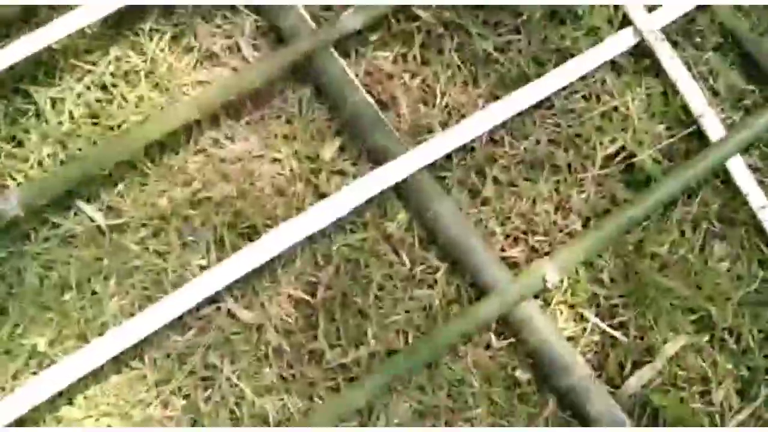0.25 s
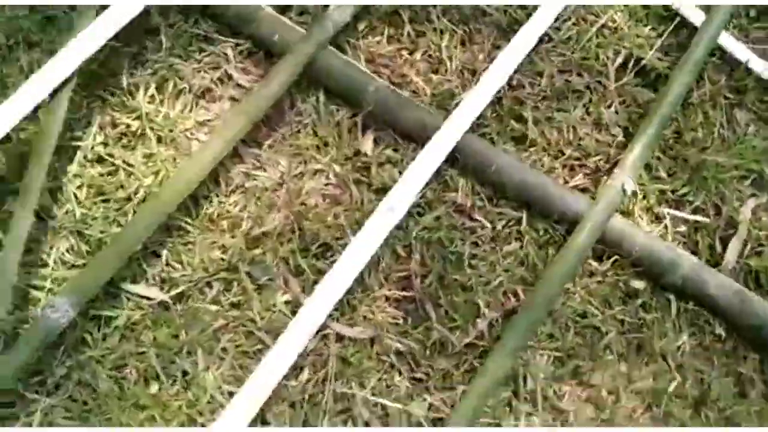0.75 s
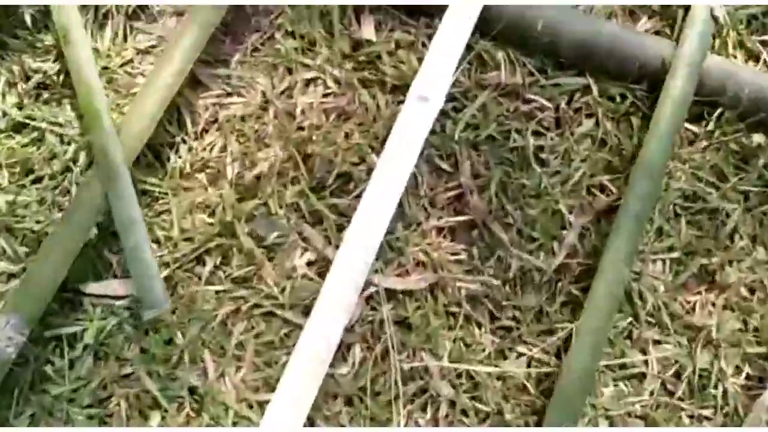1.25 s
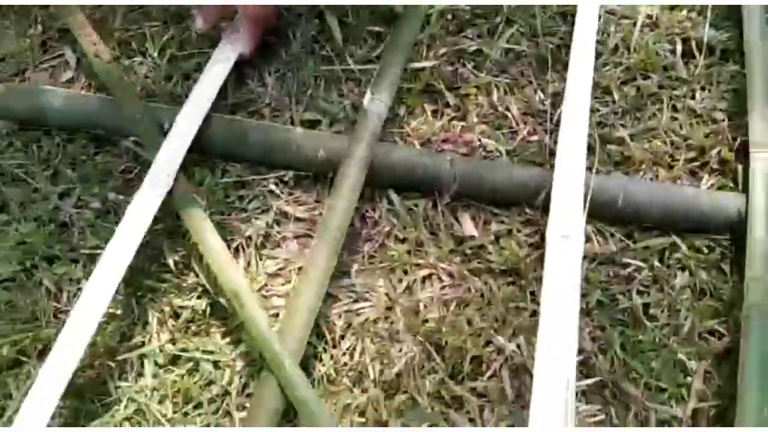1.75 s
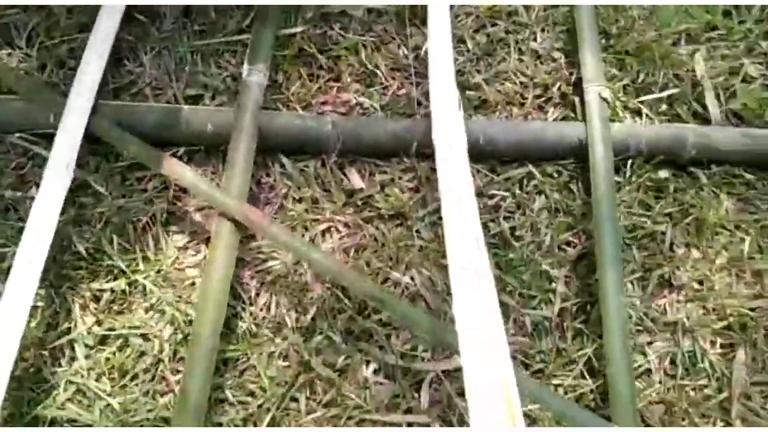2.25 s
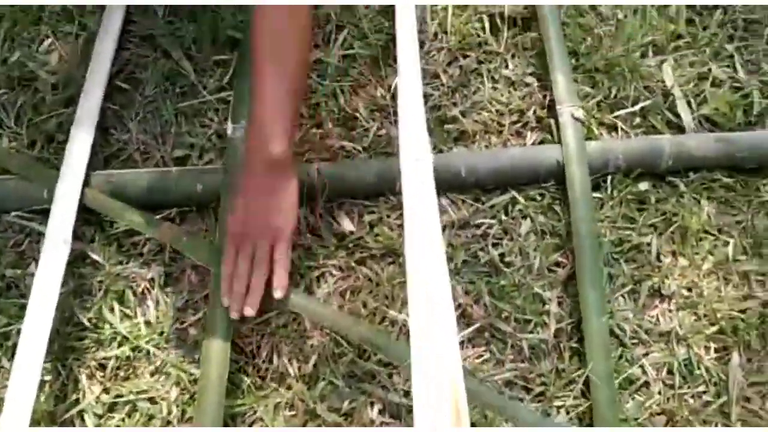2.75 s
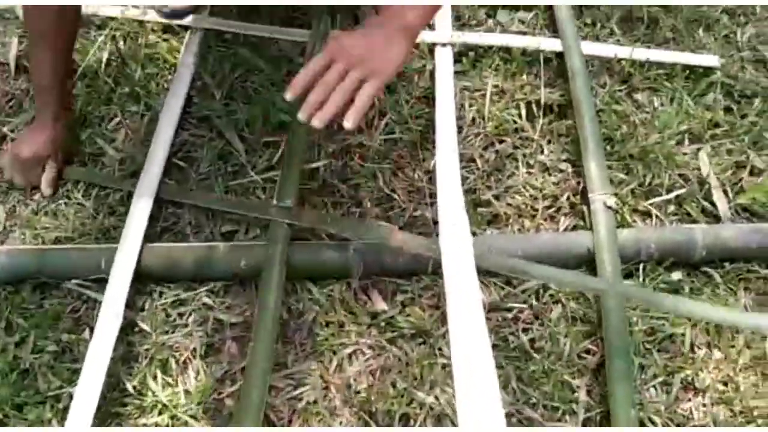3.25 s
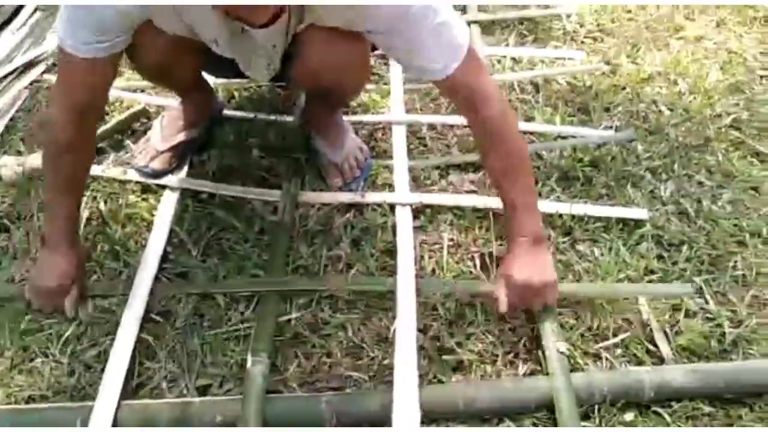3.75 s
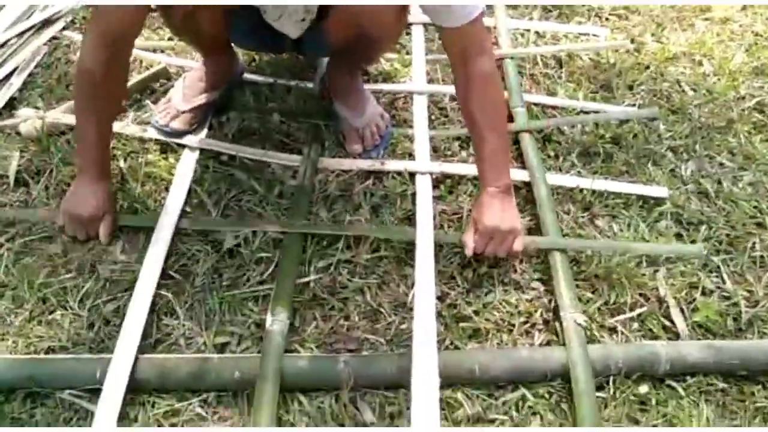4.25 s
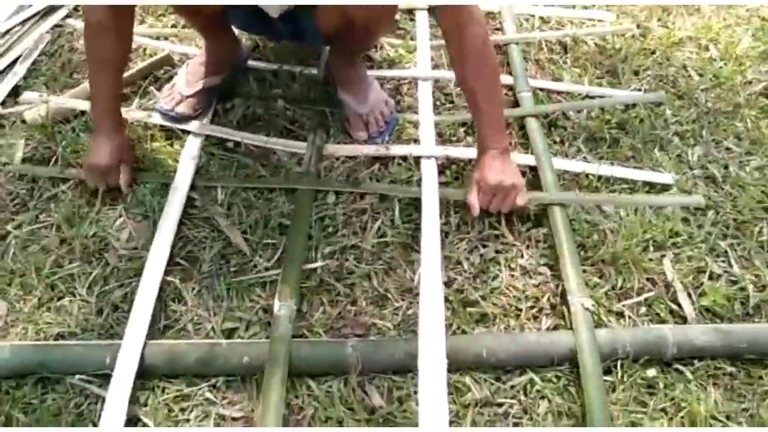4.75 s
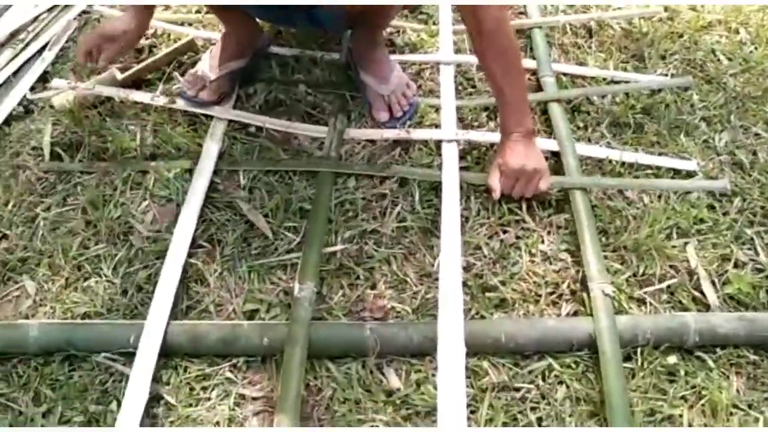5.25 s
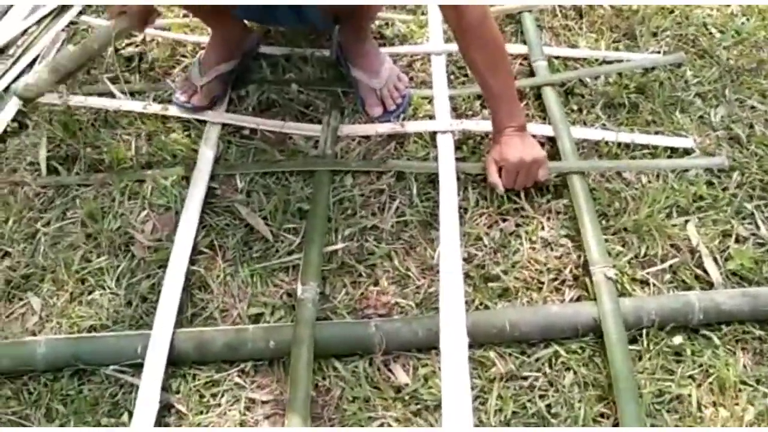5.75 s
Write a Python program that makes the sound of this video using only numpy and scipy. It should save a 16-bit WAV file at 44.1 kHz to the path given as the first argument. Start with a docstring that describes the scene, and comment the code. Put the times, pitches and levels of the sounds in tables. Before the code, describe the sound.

Close, dry bamboo clatter and raspy sliding in uneven bursts for four seconds, fading to soft rustles, one crisp snap and a thin bird call.

```python
"""Split bamboo strips are dragged over poles and knock against them, close to a phone: stick-and-slip
noise scrapes, ringing tones with a crack and a hollow knock clack, and single fibres snap.
Hands and pole ends thud on the ground as short low tones; wind buffets the microphone as low noise.
Steady noise makes an outdoor hush, wavering sines a faint far tone near 800 Hz and a bird's falling
whistles. The phone cuts the deepest bass and turns steady noise down."""
import sys
import numpy as np
from scipy import signal
from scipy.fft import rfft, irfft, next_fast_len
from scipy.io import wavfile
from scipy.ndimage import uniform_filter1d, map_coordinates

SR = 44100
rng = np.random.default_rng(int(sys.argv[2]) if len(sys.argv) > 2 else 0)


def unload_wav(signal):
    """Save mono or channel-first audio to the path in sys.argv[1] as 16-bit WAV at rate SR, clipped to [-1, 1]."""
    wavfile.write(
        sys.argv[1],
        SR,
        np.round(np.clip(np.atleast_2d(signal).T, -1, 1) * 32767).astype(np.int16),
    )


def rack_gain(trim_db):
    """Turn a fader trim in dB into the linear factor to multiply a signal by."""
    fader = np.asarray(trim_db, float)
    return 10 ** (fader / 20)


N = 263718  # length in samples

# Pulls of a strip over the poles; rise and fall are the times for 20 dB, at least 0.002 s:
# (peak t/s, rise t/s, fall t/s, peak level/dB, fibre hiss against the scrape level/dB)
STROKES = [(0.01, 1.8, 0.23, -49.5, -5.5), (0.28, -0.4, 0.4, -57, -6), (0.40, 0.14, -1.1, -51.5, 0.5),
           (0.49, 0.23, 0.47, -49.5, -5.5), (0.57, -0.3, 0.6, -49.5, -0.5), (0.658, 0.04, 0.03, -40, -0.5),
           (0.74, .1, 0.16, -49.5, 1), (0.842, 0.15, 0.13, -40, -3), (1.0, 0, 0.2, -54, -5.5),
           (1.10, 0.45, 0.12, -52.5, 0.3), (1.17, 0.1, -0.03, -54.5, 2.5), (1.365, -0.04, .12, -55, 4.5),
           (1.461, -0.0349, -0.64, -41, 1.5), (1.61, 0.4, .3, -51.5, -6), (1.71, 0.1052, 0.38, -42.5, .1),
           (1.86, 0.1539, 0.24, -36.5, -5), (1.90, 0.11, .1, -35.5, -5), (1.929, 0.0666, 0.06, -27.5, -8.5),
           (1.963, 0.09, -0.03, -36, -9), (2.12, 0.24, 0.08, -45.5, 1), (2.22, 0.22, 0.14, -45, -4),
           (2.34, 1.2, 0.7, -56.5, -7.5), (2.395, 0.0452, 0.05, -35, -1.5), (2.48, 0.14, 0.11, -43, 2.7),
           (2.77, 3.3, 3.5, -55, -2.5), (2.83, 0.1, 0.47, -44, -3), (2.9, 0.0848, 0.23, -39.5, 1),
           (2.945, .15, 0.03, -34, 0.5), (2.989, 0.0334, 0.0318, -26, -5), (3.004, 0.03, 0, -32, -0.5),
           (3.03, -0.02, 0.08, -37, -20), (3.22, -0.3, 0.1, -51, -5), (3.36, 1.1, -0.3, -51.5, -3.5),
           (3.585, 0.45, 0.3, -49.5, -3), (3.644, 0.0638, -0.0157, -34, -4.5),
           (3.682, 0.0372, 0.02, -22, -3), (3.716, 0.0667, -0.01, -25, -4.5), (3.77, -4, 1.6, -50.5, -35.5),
           (3.9, 2, 2.5, -58, -13), (4.049, 0.1, 0.28, -39.5, -0.5), (4.2, 0.35, 0.35, -42.5, -0.5),
           (4.269, -0.34, 0.01, -42, 1), (4.44, 0.15, 0.19, -43.5, 3), (4.51, 0.24, 0.02, -43.5, 2.5),
           (4.669, -0.9, 0.2, -50.5, -1), (4.743, 0.27, 0, -46.5, 7), (4.834, -2.3, 0.65, -57.5, -15),
           (4.968, 0, 0.26, -51, 0.7), (5.11, -0.3, 0.5, -59, 0.5), (5.39, 0.05, 0.24, -57.5, 2.5),
           (5.569, 0.13, 0.16, -51.5, -2), (5.98, -0.2, 4.2, -52, -4)]
# How firmly the strip bears on the poles: (t/s, sound of the poles against the scrape level/dB)
BEARING = [(0, -11.5), (0.3, -9.5), (0.45, -16), (0.8, -13.5), (1.15, -13), (1.25, -33), (1.42, -35),
           (1.5, -15), (1.8, -14.5), (1.9, -19.5), (2.05, -10.5), (2.3, -14), (2.45, -12.5), (2.75, -18),
           (2.92, -24), (3.05, -10.5), (3.3, -11), (3.5, -21), (3.68, -20.5), (3.8, -9), (4.0, -20.5),
           (4.4, -20), (4.53, -9.5), (4.7, -31), (4.87, -21), (4.93, -11.5), (5.13, -11), (5.22, -40),
           (5.5, -38), (5.56, -7.5), (5.8, -7.5), (5.98, -25)]
# Tone colour of the scraping strip: (f/Hz, relative level per Hz level/dB)
SCRAPE_COLOUR = [(820, -55.5), (1400, -19.5), (1660, -20), (2060, -12), (2330, -3.5), (2670, -2),
                 (3010, -5), (3670, -6), (4370, -13.5), (4900, -34.5), (6370, -64), (10800, -120)]
# Tone colour of the hissing fibres: (f/Hz, relative level per Hz level/dB)
FIBRE_COLOUR = [(2760, -44), (4700, -9), (5000, -10.5), (5180, -7.5), (6230, -2.5), (6830, -2), (7450, 1.5),
                (12000, -25.5), (15000, -33), (16000, -38)]
# Tone colour of the rubbed hollow poles: (f/Hz, relative level per Hz level/dB)
POLE_COLOUR = [(150, -48.5), (250, -16.5), (663, -12.5), (842, -12.5), (1020, -8.5), (1260, -15.5),
               (1800, -9.5), (2340, -40.5), (3960, -120)]
# After each knock a low-mid noise tail lingers and fades: level against the knock, time to fall by 20 dB
TAIL_DB, TAIL_FALL_S = -14, 0.062

# Puffs of wind; rise and fall are the times for 20 dB, at least 0.002 s:
# (peak t/s, rise t/s, fall t/s, peak level/dB)
GUSTS = [(0.0, .02, 0.06, -45), (0.315, .012, 0.1, -58), (0.42, 0.43, .06, -59), (0.53, -2, 0.5, -64.5),
         (0.66, 0.5, 0.02, -59), (0.8, -0.7, 0, -70), (1.67, -0.03, .24, -58), (1.96, 2.2, 2, -77),
         (2.4, 0.02, -0.03, -55.5), (2.5, 0.14, 0.03, -48.5), (2.86, -1, -2.7, -79),
         (3.03, -0.2, 0.15, -58), (3.33, -0.1, 5, -84.5), (3.49, -0.1, 0.12, -61), (3.66, -0.1, 0, -60),
         (3.75, 0.2, .08, -56), (4.06, -0.5, 0, -84.5), (4.48, .015, 0.11, -46.5), (4.62, -0.6, 0.5, -67.5),
         (4.75, -0.1, -0.03, -57), (4.85, 0.4, -0.5, -66.5), (5.11, .08, 2, -79.5),
         (5.535, -0.34, 0.1, -61)]
# Tone colour of the wind at the microphone: (f/Hz, relative level per Hz level/dB)
WIND_COLOUR = [(13, -40), (22, -20), (52, -0.5), (96, -3.5), (182, -10.5), (250, -28.5), (320, -61.5),
               (550, -120)]
CALM_DB = -91.5  # steady wind beneath the puffs

# Tone colour of the outdoor hush: (f/Hz, relative level per Hz level/dB)
HUSH_COLOUR = [(26, -42.5), (45, -18), (179, -5.5), (536, -11), (984, -12), (1190, -20), (1770, 2.5),
               (3240, -0.5), (3480, 2), (4390, -3.5), (4710, -3), (6540, 0), (8860, -1.5), (12000, -25.5),
               (15600, -55.5), (22000, -120)]

# Blows of strip on pole: (t/s, peak of the strip's ring level/dB, favoured ring f/Hz,
# crack of the skins against the ring level/dB, hollow knock against the ring level/dB)
CLACKS = [(0.1346, -35, 1770, -31.5, -7.5), (0.1638, -38.5, 2590, -8.5, -8), (0.197, -30.5, 2410, -29, -19),
          (0.231, -41.5, 2380, -5, -9), (0.2974, -39.5, 1660, -11.5, -11), (0.4017, -38, 2330, -23.5, -31),
          (0.4433, -16.5, 3320, -21, -40), (0.4453, -6.5, 2470, -50, -42), (0.454, -20, 2480, -15, -28),
          (0.457, -15, 2500, -10, -31), (0.4586, -13, 2470, -28, -28), (0.5821, -17.5, 3300, -11, -28.5),
          (0.6257, -10.5, 2460, -5.5, -29.5), (0.6345, -18.5, 2670, -8.5, -21),
          (0.7567, -20, 3460, -21, -21.5), (0.8587, -30.5, 2570, -3, -13), (0.8621, -14.5, 2610, -11, -38),
          (0.9299, -39.5, 2570, -12.5, -4), (0.99, -40.5, 2740, -5.5, -14), (1.4853, -36, 2180, -13, -10),
          (1.5143, -40, 2980, -17.5, -12.5), (1.5378, -41.5, 2760, -7, -26), (1.5945, -44, 2870, 1, -14.5),
          (1.76, -24.5, 2680, 4.5, -47), (1.767, -26, 2350, 2, -25), (1.777, -22, 2330, -10, -42),
          (1.835, -36, 2780, 9, -43), (1.86, -16, 2680, -19, -27), (1.8731, -15, 2630, -15.5, -28),
          (1.883, -17, 2600, -7, -21), (1.8939, -15.5, 2480, -4, -40), (1.925, -17, 2540, -10, -33.5),
          (1.938, -22, 2500, -10, -12), (1.9596, -31.5, 2500, -16, -5), (2.0059, -17.5, 2740, -11.5, -11.5),
          (2.0601, -16.5, 3110, -12.5, -14.5), (2.1335, -19, 2230, -11, -23), (2.213, -37, 3450, -40, -18),
          (2.364, -29, 2540, -9, -9), (2.389, -30.5, 2680, -9, -4.5), (2.435, -7.5, 2630, -28, -14.5),
          (2.4366, -7.5, 3160, -6.5, -18), (2.532, -22, 2950, -34, -11.5), (2.9681, -21.5, 2510, 0, -16),
          (2.9871, -19, 2330, 3.5, -48), (3.0004, -21, 2280, 3.5, -8), (3.0561, -21.5, 2400, -12, -16),
          (3.1416, -28, 2980, -18, -16.5), (3.1753, -40, 2070, 4.5, -7.5), (3.2406, -35.5, 2600, -8, -46),
          (3.26, -18, 2300, -13.5, -23.5), (3.271, -24.5, 2380, -12, -12.5),
          (3.3621, -37.5, 2480, -3.5, -14.5), (3.6202, -25, 3800, -0.5, -25),
          (3.6268, -7.5, 2670, -3.5, -32), (3.635, -12.5, 3300, -13, -20), (3.6957, -13, 2780, -37.5, -32),
          (3.707, -8, 2580, -25, -27), (3.7122, -17, 2280, -10, -12.5), (3.7398, -26, 2380, -32, -9),
          (3.7911, -14, 2410, -17, -21), (3.8156, -22.5, 2330, -19.5, -11.5), (3.8545, -30, 2500, -22, -21),
          (4.0625, -30, 2610, -7, -12.5), (4.8861, -38.5, 1780, -9, -9.5), (5.5408, -37.5, 1940, -7, -7),
          (5.6595, -37.5, 2200, -2, -50), (5.7209, -33, 2640, 1, -11), (5.725, -27.5, 2310, -4, -12.5)]
# Bending tones of a strip: (f/Hz, relative level/dB)
STRIP_TONES = [(1450, -6.5), (1750, -3.5), (2050, -1), (2300, -4), (2480, 1), (2680, -1.5), (2930, -1),
               (3280, 1.5), (3480, -1), (3800, 1.5), (4100, -2), (4400, -14)]
# Tones of the air and wall of the hollow poles: (f/Hz, relative level/dB)
POLE_TONES = [(330, -10), (480, -9.5), (590, -4), (700, -2), (810, -1.5), (930, -2.5), (1040, 0),
              (1180, -1), (1300, 3)]
# Tone colour of the cracking hard skins: (f/Hz, relative level per Hz level/dB)
SKIN_COLOUR = [(2760, -39.5), (4700, -10), (5310, -10.5), (6480, -3), (7450, -3.5), (10500, -25),
               (11200, -35), (15000, -49)]
# Time for a ring at RING_AT_HZ to fall by 60 dB; higher rings die sooner by this power of pitch
RING_T60_S, RING_AT_HZ, DAMPING_GROWS = 0.032, 2500, 0.8
KNOCK_RISE_S = 0.0026  # the air in a pole answers a little after the blow

# Single fibres snapping: (t/s, peak level/dB, f/Hz)
SNAPS = [(0.377, -44, 7000), (1.661, -31, 6000), (2.2646, -35.5, 6060), (2.3644, -29, 4000),
         (3.486, -26, 4000), (4.4597, -11.5, 7500), (4.4721, -17.5, 4420), (5.659, -38.5, 6050)]
# The snap swells for half this many cycles, then fades; a push in air pressure lies under its ring
SNAP_CYCLES, SNAP_PUSH_DB = 1.56, -13.5

# Dull blows on the ground: (t/s, peak level/dB, f/Hz, time to fall by 60 dB t/s)
THUDS = [(1.665, -47.5, 133, 0.18), (2.41, -39.5, 594, 0.11), (2.877, -48, 189, 0.47),
         (3.005, -30.5, 510, 0.049), (3.328, -49, 191, 0.18), (3.479, -41, 187, 0.032),
         (3.665, -35.5, 519, 0.07), (4.064, -46, 424, 0.13), (4.462, -31, 248, 0.032),
         (4.4755, -23.5, 564, 0.019), (4.479, -34, 134.4, 0.078), (4.545, -48, 247, 0.1),
         (4.736, -46, 226.5, 0.023), (4.83, -55, 167, 0.06), (5.098, -54.5, 276.5, 0.15),
         (5.527, -45, 156, 0.13), (5.565, -50, 200.3, 0.24), (5.866, -57.5, 298.6, 0.044),
         (5.92, -64, 302, 0.08)]

# Far held tone, before its waver and flutter: (t/s, f/Hz, rms level/dB)
FAR_TONE = [(2.1, 790, -92), (2.18, 833, -69), (2.6, 813, -67), (2.85, 821, -70.5), (3.3, 846, -74),
            (3.6, 800, -68.5), (3.68, 800, -103)]
# About an octave above it, one list a note, before waver and flutter: (t/s, f/Hz, rms level/dB)
FAR_OCTAVE = [
    [(2.62, 1530, -74), (2.7, 1575, -62), (2.78, 1626, -60), (2.84, 1620, -87)],
    [(3.42, 1680, -81), (3.48, 1660, -59), (3.56, 1620, -63.5), (3.62, 1560, -78.5)],
]

# Bird whistles, one list a note, before waver and flutter: (t/s, f/Hz, rms level/dB)
BIRD = [
    [(3.38, 2720, -75), (3.42, 2680, -63), (3.47, 2600, -72)],
    [(3.54, 2820, -70), (3.57, 2800, -54), (3.62, 2780, -60)],
    [(3.86, 2910, -62), (3.92, 2870, -55), (3.96, 2790, -56), (4.01, 2600, -59)],
    [(4.15, 2650, -66), (4.2, 2670, -54), (4.27, 2650, -53), (4.33, 2600, -66)],
    [(4.47, 3150, -56), (4.52, 2960, -50), (4.57, 2710, -53), (4.6, 2650, -53), (4.625, 2630, -68)],
]

# Most that the noise suppressor can turn each pitch down: (f/Hz, depth level/dB)
SUPPRESSION = [(60, 5), (250, 21), (1200, 19), (2200, 5), (4100, 5), (4750, 17), (5800, 3), (11000, 5)]


def unit(x):
    """Scale to rms 1."""
    return x / np.sqrt(np.mean(x ** 2) + 1e-20)


def peak(x):
    """Scale to peak 1."""
    return x / np.abs(x).max()


def add(track, s, x):
    """Mix x into track from time s."""
    part = track[round(s * SR):][:len(x)]
    part += x[:len(part)]


def curves(rows):
    """Draw one value per sample for each column after the time."""
    s, *columns = np.transpose(rows)
    return [np.interp(np.arange(N) / SR, s, column) for column in columns]


def wobble(rate):
    """A smooth random curve through this many random points a second."""
    points = rng.standard_normal(int(N * rate / SR) + 4)
    return map_coordinates(points, [np.arange(N) * rate / SR])


def coloured(x, spectrum):
    """Filter x through a spectrum of (f/Hz, level/dB) points, then scale to rms 1."""
    m = next_fast_len(len(x) + 8192)  # spare room for the filter's tail
    hz, db = np.transpose(spectrum)
    log_hz = np.log(np.fft.rfftfreq(m, 1 / SR) + 1)
    gain = rack_gain(np.interp(log_hz, np.log(hz), db))
    return unit(irfft(rfft(x, m) * gain, m)[:len(x)])


def swells(peak_s, rise_s, fall_s, db):
    """Gain per sample of swells that climb and sink evenly in dB; their powers add."""
    late = np.arange(0, N + 32, 32) / SR - np.asarray(peak_s)[:, None]  # one point every 32 samples
    rise, fall = np.reshape(rise_s, (-1, 1)), np.reshape(fall_s, (-1, 1))
    span = np.maximum(np.where(late < 0, rise, fall), 0.002)
    level_db = np.asarray(db)[:, None] - 20 * np.abs(late) / span
    power = np.sum(rack_gain(level_db) ** 2, axis=0)
    return np.sqrt(np.interp(np.arange(N) / 32, np.arange(len(power)), power))


def slips(rate, spread_db, judder_db, judder_hz, smooth):
    """Stick and slip: about rate tiny uneven jerks a second over smooth rubbing, all juddering in level."""
    luck = np.minimum(rng.exponential(size=N), 3)
    size = rack_gain(spread_db * luck) * rng.standard_normal(N)
    jerks = unit(size * (rng.random(N) < rate / SR))
    rubbing = smooth * rng.standard_normal(N)
    return rack_gain(judder_db * wobble(judder_hz)) * (jerks + rubbing)


def patchy(x, patchy_db):
    """The contact point slides along the strip, so narrow bands of pitch come and go."""
    z = signal.stft(x, nperseg=512)[2]
    field = rng.standard_normal(z.shape)
    field = uniform_filter1d(field, size=3, axis=0)  # smooth over pitch
    field = uniform_filter1d(field, size=7, axis=1)  # smooth over time
    return unit(signal.istft(z * rack_gain(patchy_db * unit(field)), nperseg=512)[1][:N])


def drag():
    """One rubbing motion excites strip, fibres and hollow poles; a low-mid noise tail follows each knock."""
    s, rise, fall, db, hiss_db = np.transpose(STROKES)
    scrape = swells(s, rise, fall, db)
    hiss = swells(s, rise, fall, db + hiss_db)
    hit_s, hit_db, _, _, knock_db = np.transpose(CLACKS)
    tail = swells(hit_s, 0.002, TAIL_FALL_S, hit_db + knock_db + TAIL_DB)
    low_mid = np.hypot(scrape * rack_gain(curves(BEARING)[0]), tail)

    rub = slips(rate=1500, spread_db=2.3, judder_db=2.4, judder_hz=70, smooth=1.2)
    fine = slips(rate=3900, spread_db=4, judder_db=1.5, judder_hz=72.7, smooth=2.3)
    dull = slips(rate=600, spread_db=3, judder_db=2.5, judder_hz=30, smooth=1.1)
    # the shared rub ties the three sounds together
    strip_sound = patchy(coloured(rub, SCRAPE_COLOUR), patchy_db=1.0)
    fibre_sound = patchy(coloured(0.89 * rub + fine, FIBRE_COLOUR), patchy_db=2.0)
    pole_sound = patchy(coloured(0.68 * rub + dull, POLE_COLOUR), patchy_db=0.5)
    return scrape * strip_sound + hiss * fibre_sound + low_mid * pole_sound


def wind():
    """Wind buffets the microphone port: lumpy low noise swells in puffs."""
    lumps = rack_gain(2.5 * wobble(18)) * rng.standard_normal(N)
    gain = swells(*np.transpose(GUSTS)) + rack_gain(CALM_DB)
    return gain * coloured(lumps, WIND_COLOUR)


def hush():
    """Leaves and distance blend into smooth noise whose level drifts slightly."""
    return rack_gain(-55.0 + 0.84 * wobble(2.964)) * coloured(rng.standard_normal(N), HUSH_COLOUR)


def ring(tones, t, t60, favour_db, detune, scatter_db):
    """Dying tones; each blow lands elsewhere, so pitch, strength and phase shift."""
    hz, db = np.transpose(tones)
    pitch_luck, level_luck, start_phase = rng.standard_normal((3, len(hz)))
    shifted_hz = hz * (1 + detune * pitch_luck)
    phase = 2 * np.pi * shifted_hz[:, None] * t + start_phase[:, None]
    strength = rack_gain(db + favour_db + scatter_db * level_luck)
    return strength @ np.sin(phase) * rack_gain(-60 * t / t60)


def clacks():
    """Strip on pole: the strip rings and rattles, the hard skins crack, the hollow pole knocks."""
    track, t = np.zeros(N), np.arange(SR // 6) / SR
    strip_hz = np.array(STRIP_TONES)[:, 0]
    for s, db, hz, crack_db, knock_db in CLACKS:
        t60 = RING_T60_S * (RING_AT_HZ / hz) ** DAMPING_GROWS
        rise = 1 - np.exp(-t / (0.033 * t60))  # short rings start sharper
        # tones near the favoured pitch take most of the blow
        favour_db = -np.minimum(40 * np.abs(np.log2(strip_hz / hz)), 14)
        wood = peak(rise * ring(STRIP_TONES, t, t60, favour_db, detune=0.034, scatter_db=2.0))
        skin_noise = coloured(rng.standard_normal(len(t)), SKIN_COLOUR)
        crack = peak(rise * skin_noise * rack_gain(-60 * t / (0.78 * t60)))
        knock_rise = 1 - np.exp(-t / KNOCK_RISE_S)
        knock = peak(knock_rise * ring(POLE_TONES, t, 1.2 * t60, 0, detune=0.07, scatter_db=3.5))
        # the loose strip rattles on a little after the blow
        rattle_noise = coloured(rng.standard_normal(len(t)), SCRAPE_COLOUR)
        rattle = rise * rattle_noise * rack_gain(-20 - 60 * t / (2.2 * t60))
        blow = wood + rattle + rack_gain(crack_db) * crack + rack_gain(knock_db) * knock
        add(track, s - 0.0015, rack_gain(db) * blow)  # starts early to leave time for the rise
    return track


def snaps():
    """A fibre lets go: a few quick cycles riding on a tiny push in air pressure."""
    track, t = np.zeros(N), np.arange(SR // 100) / SR
    for s, db, hz in SNAPS:
        u = hz * t / SNAP_CYCLES
        swell = u * np.exp(-2 * u)
        add(track, s, rack_gain(db) * peak(swell * (np.sin(2 * np.pi * hz * t) - rack_gain(SNAP_PUSH_DB))))
    return track


def thuds():
    """Soft contact with the ground: a low ring and a puff of low noise die away together."""
    track, t = np.zeros(N), np.arange(SR // 4) / SR
    for s, db, hz, t60 in THUDS:
        fade = rack_gain(-60 * t / t60) * (1 - np.exp(-t / 0.002))
        puff_colour = [(30, -30), (0.5 * hz, -6), (hz, 0), (1.9 * hz, -14), (9 * hz, -45)]
        puff = coloured(rng.standard_normal(len(t)), puff_colour)
        thud = peak(fade * (np.sin(2 * np.pi * hz * t) + 0.55 * puff))
        add(track, s - 0.003, rack_gain(db) * thud)  # starts early to leave time for the rise
    return track


def whistle(rows, waver_hz, flutter_db):
    """A slightly unsteady sine along a pitch and level curve."""
    hz, db = curves(rows)
    t = np.arange(N) / SR
    sounding = (t > rows[0][0]) & (t < rows[-1][0])
    phase = 2 * np.pi * np.cumsum(hz + waver_hz * wobble(60)) / SR
    level = np.sqrt(2) * rack_gain(db + flutter_db * wobble(24.71))  # a sine peaks at sqrt(2) times its rms
    return sounding * level * np.sin(phase)


def far_tone():
    """A faint held sine; now and then a rougher one shows about an octave above."""
    octave = sum(whistle(note, waver_hz=30, flutter_db=3) for note in FAR_OCTAVE)
    return whistle(FAR_TONE, waver_hz=10, flutter_db=2.5) + octave


def bird():
    """A bird's short whistles, mostly falling: each is one gliding sine."""
    return sum(whistle(note, waver_hz=9, flutter_db=1.8) for note in BIRD)


def scene():
    """Everything reaches one microphone in the open air."""
    bamboo = drag() + clacks() + snaps()
    return (bamboo + wind() + hush() + thuds() + far_tone() + bird())[None]


def suppressed(x, margin_db, release_db):
    """Turn each band down near its own quiet level; a sudden sound opens it, then it closes slowly."""
    hz, t, z = signal.stft(x, SR, nperseg=512, noverlap=384)
    power = uniform_filter1d(np.abs(z) ** 2, size=4, axis=0)  # smooth over pitch
    power = uniform_filter1d(power, size=7, axis=1)  # smooth over time
    level = 10 * np.log10(np.abs(power) + 1e-20)
    quiet = np.percentile(level, 15, axis=1)[:, None]
    excess = np.minimum(level - quiet - margin_db, 16)
    # after each peak, the held excess sinks by release_db a second
    held = np.maximum.accumulate(excess + release_db * t, axis=1) - release_db * t
    depth_db = np.interp(hz, *np.transpose(SUPPRESSION))[:, None]
    gain = rack_gain(-depth_db / (1 + np.exp(held / 3)))
    return signal.istft(z * gain, SR, nperseg=512, noverlap=384)[1][:N]


def top_cut(x):
    """Nothing passes above the cut-off."""
    return signal.sosfilt(signal.butter(12, 15830, fs=SR, output="sos"), x)


def record(dry):
    """The microphone cuts the deepest bass; then the phone turns steady noise down."""
    low_cut = signal.butter(3, 58, "high", fs=SR, output="sos")
    heard = suppressed(signal.sosfilt(low_cut, dry[0]), margin_db=4, release_db=80.5)
    return top_cut(heard[None])


dry = scene()
out = record(dry)
unload_wav(out)
```